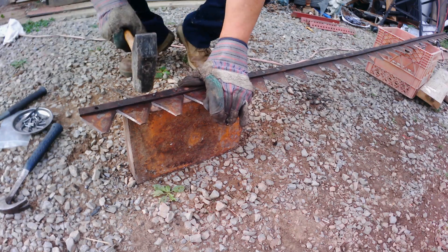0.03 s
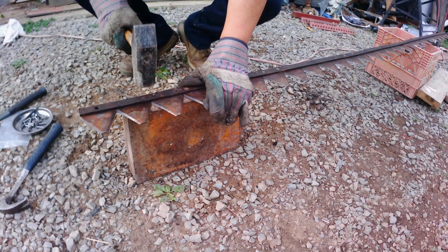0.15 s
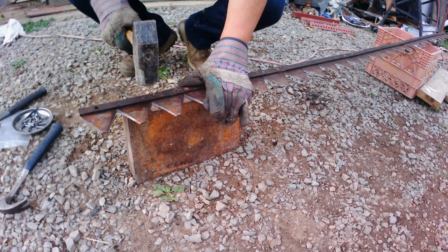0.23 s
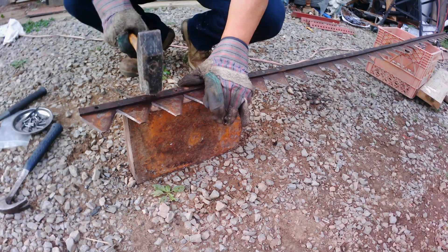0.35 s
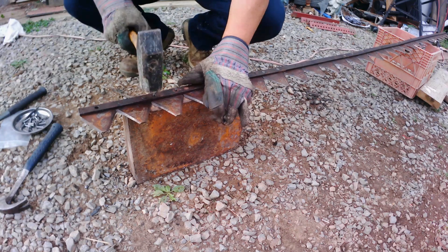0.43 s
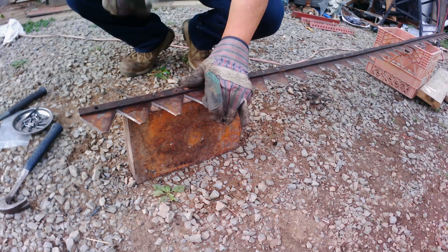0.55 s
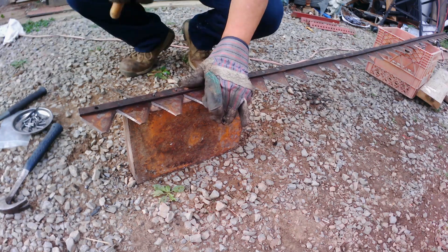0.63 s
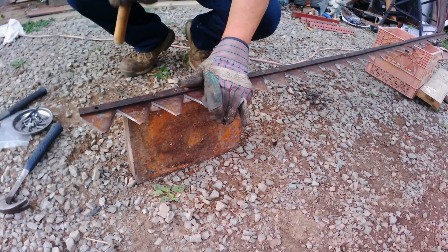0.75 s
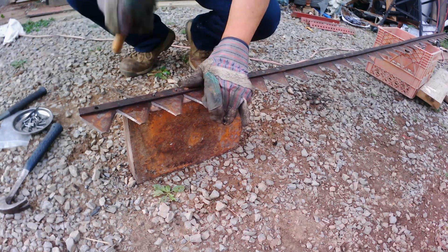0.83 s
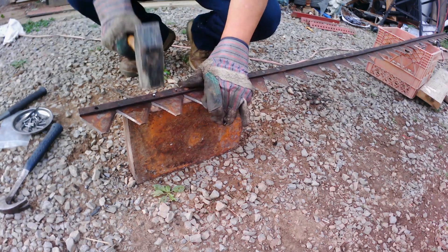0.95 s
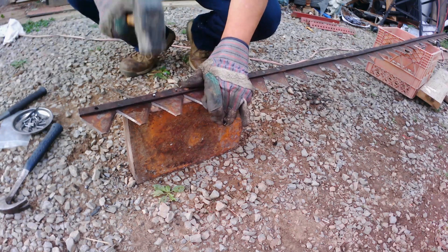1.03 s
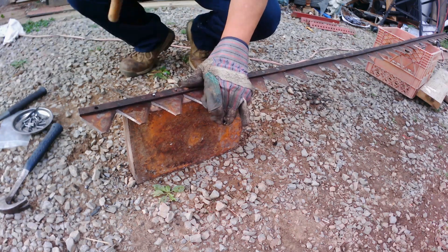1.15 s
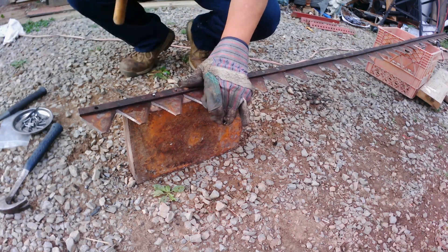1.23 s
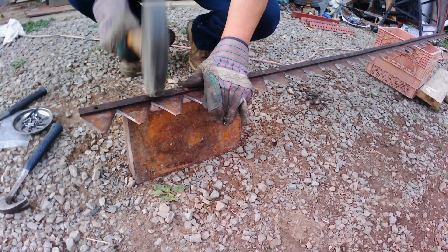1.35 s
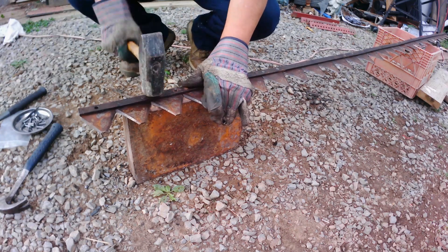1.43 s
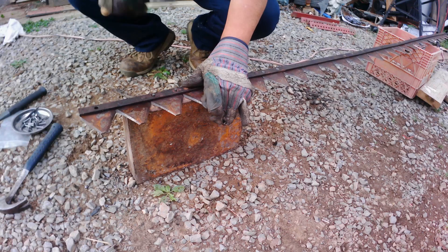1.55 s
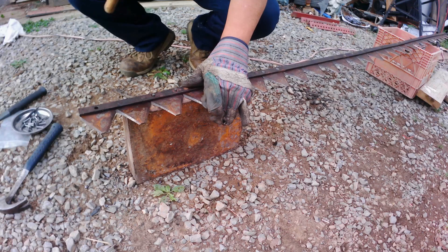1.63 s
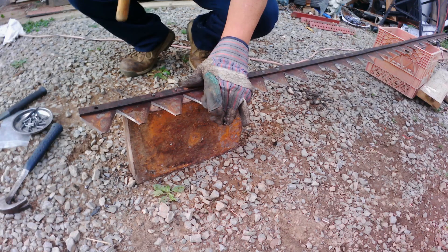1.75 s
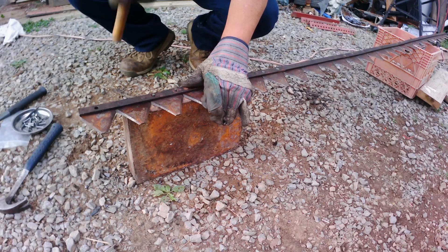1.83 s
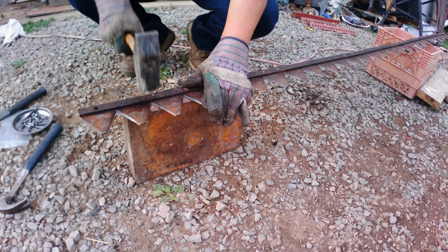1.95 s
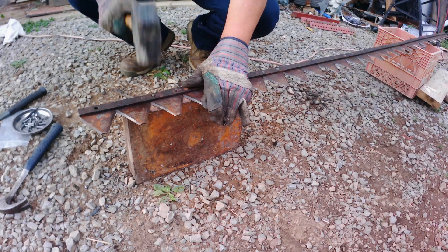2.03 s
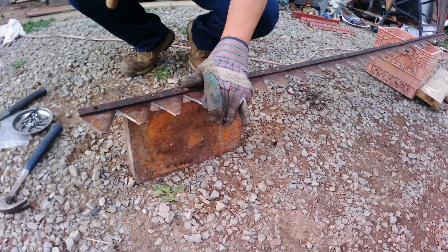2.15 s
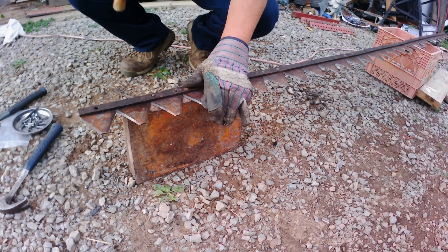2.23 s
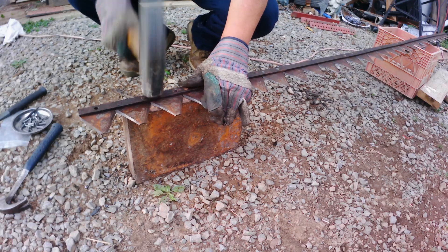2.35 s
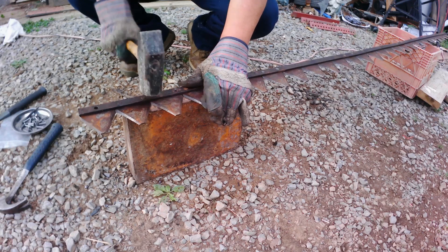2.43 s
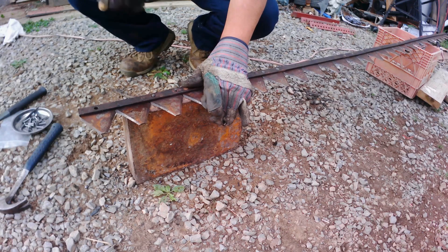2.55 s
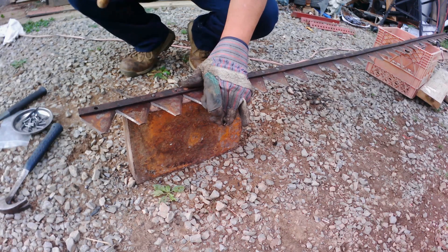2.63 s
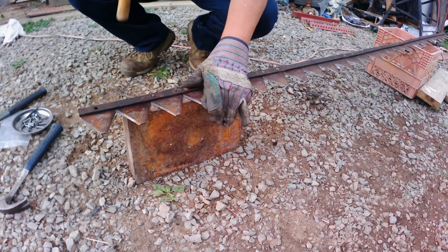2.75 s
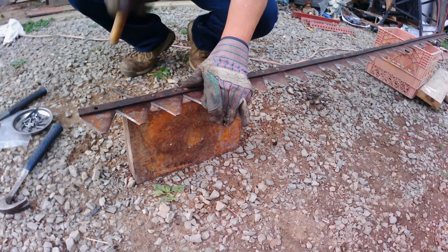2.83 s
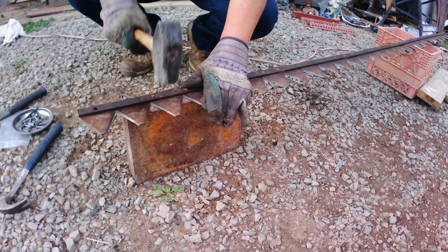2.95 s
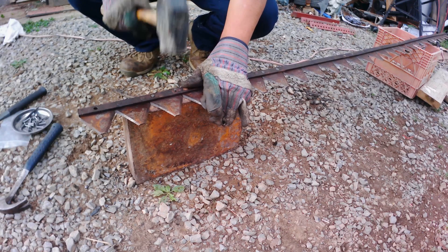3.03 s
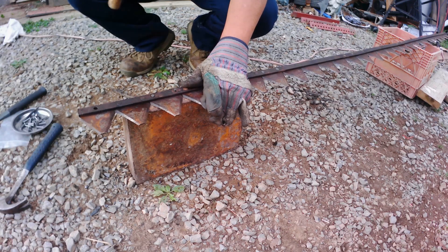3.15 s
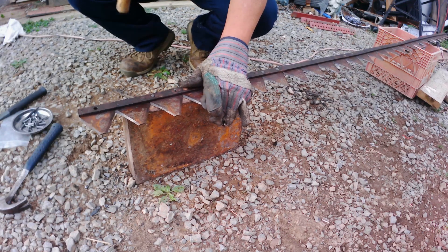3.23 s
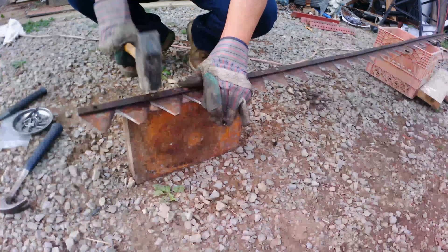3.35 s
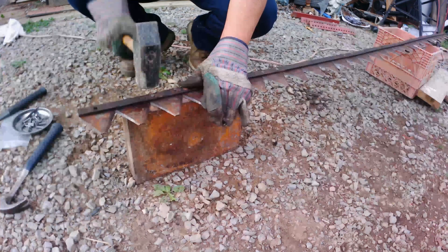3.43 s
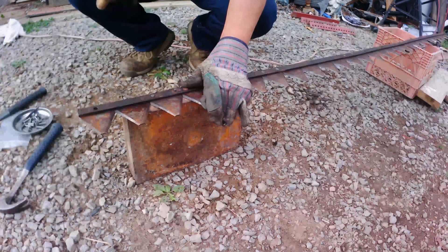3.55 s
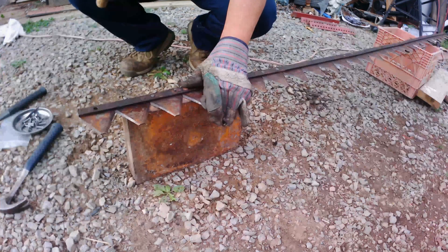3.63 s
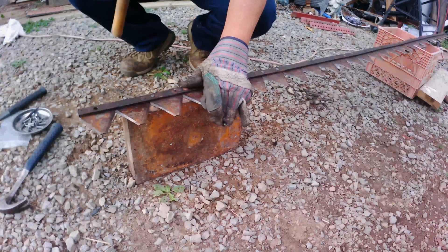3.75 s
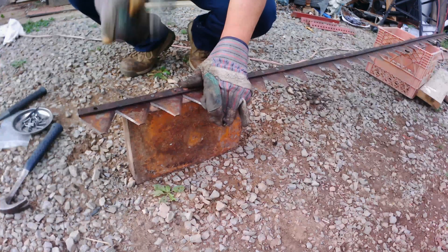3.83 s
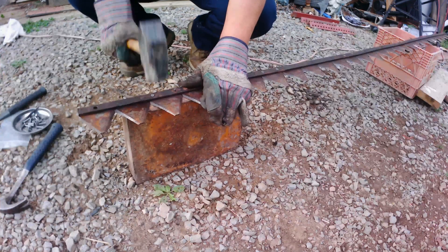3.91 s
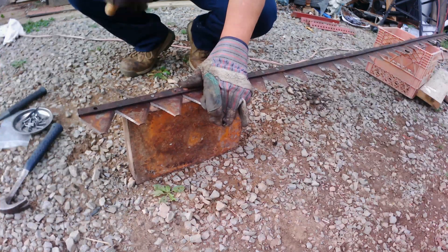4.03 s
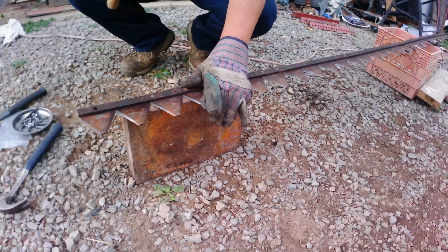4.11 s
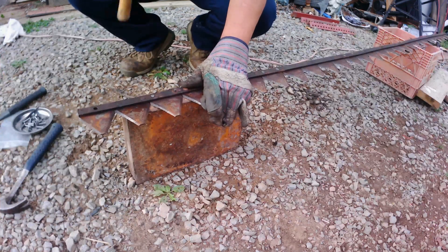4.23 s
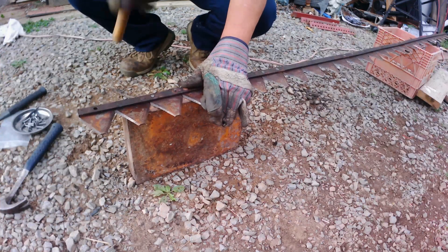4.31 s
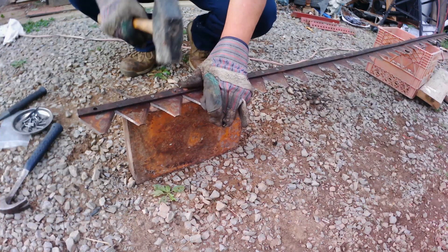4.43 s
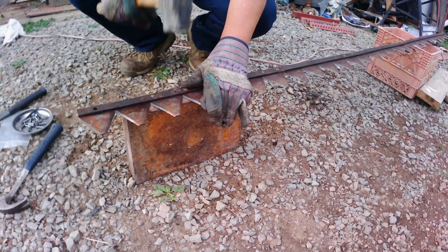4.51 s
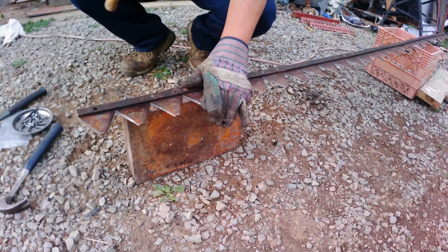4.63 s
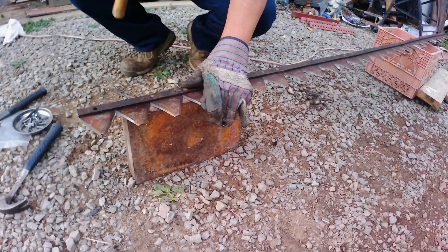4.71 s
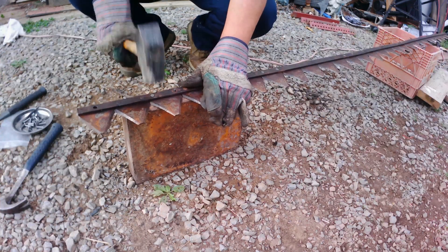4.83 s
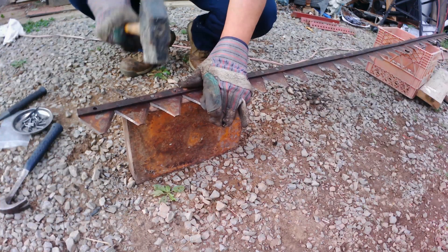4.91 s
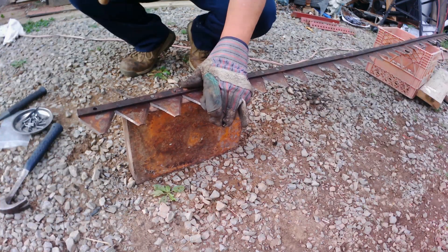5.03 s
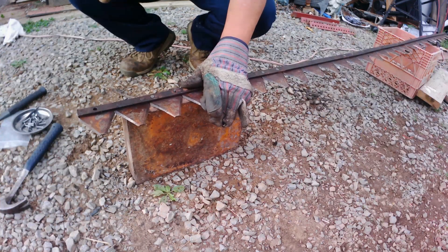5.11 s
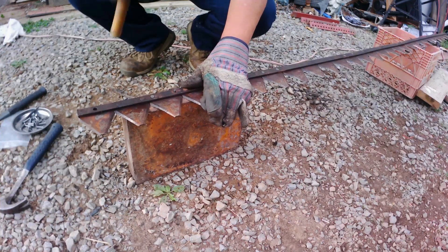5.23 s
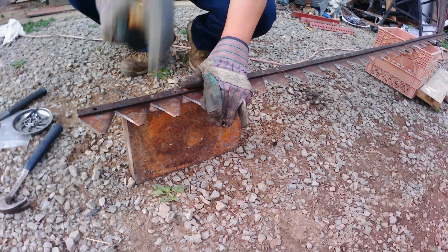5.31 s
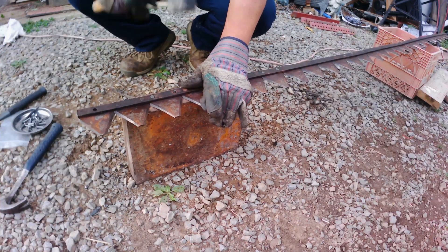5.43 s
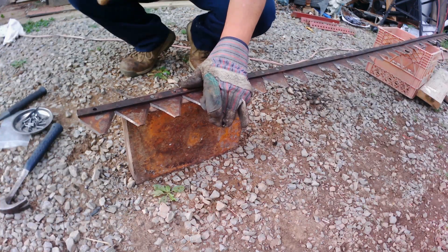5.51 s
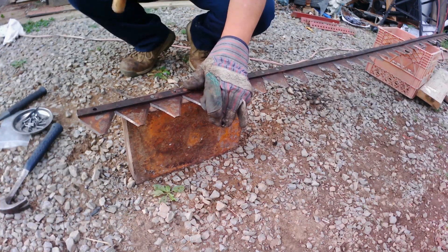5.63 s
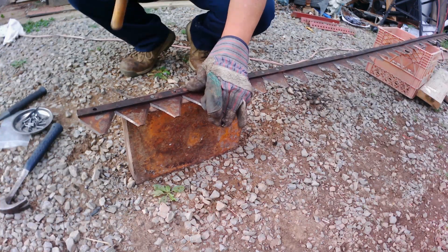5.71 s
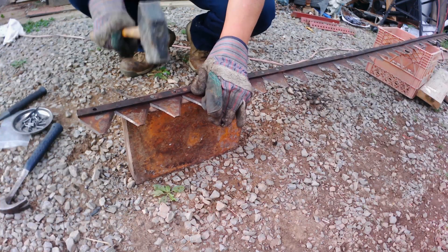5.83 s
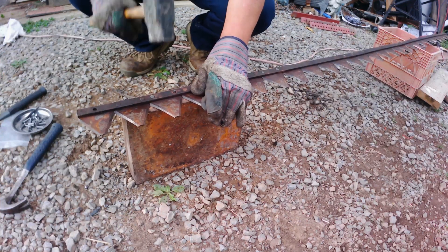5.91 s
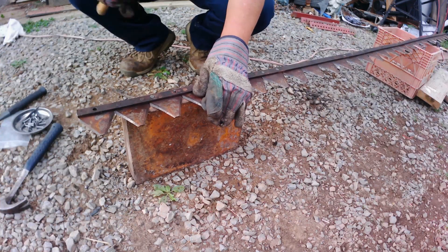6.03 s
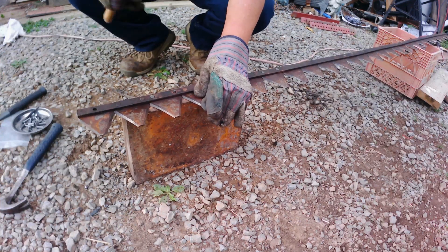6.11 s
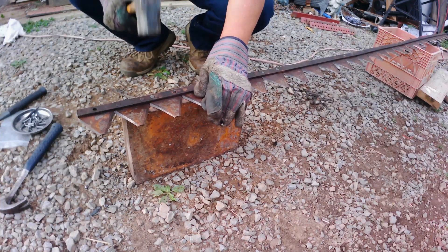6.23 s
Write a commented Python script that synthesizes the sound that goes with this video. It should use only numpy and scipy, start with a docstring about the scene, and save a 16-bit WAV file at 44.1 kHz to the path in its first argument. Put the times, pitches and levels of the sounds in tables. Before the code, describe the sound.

Close, evenly paced metallic hammer blows set a rivet outdoors, growing sharper, while a faraway machine holds a faint steady tone.

```python
"""An open yard, microphone close to a steel block on gravel: a heavy hammer sets a rivet in a cutter bar.
The soft rivet swallows the first of eleven blows; as it flattens, bar and block ring harder and brighter.
Each blow rattles blades and stones, thumps the ground, overloads the microphone and echoes faintly.
Soft scuffs on the gravel come first; in the distance a machine whines over the murmur of the air."""
import sys
import numpy as np
from scipy import signal
from scipy.fft import rfft, irfft
from scipy.io import wavfile

SR = 44100
rng = np.random.default_rng(int(sys.argv[2]) if len(sys.argv) > 2 else 0)


def wrap_up_sound(samples):
    """Save the sound to the file named by the first command line argument, as 16-bit audio."""
    columns = np.atleast_2d(samples).T
    # keep every value between -1 and 1, then stretch to whole-number steps
    tamed = np.clip(columns, -1, 1)
    steps = np.round(tamed * 32767).astype(np.int16)
    wavfile.write(sys.argv[1], SR, steps)


N = 276507
TIME = np.arange(N) / SR
AFTER = TIME[:SR * 3 // 4]  # time since a blow or scuff [s]

# outdoor background: (frequency [Hz], spectral level [dB])
AIR_SPECTRUM = [(20, -16), (60, -6), (160, 2), (300, -5), (550, -4.5), (800, -9), (1200, -5.5), (1600, -13),
                (2400, -20), (3400, -29), (7000, -32.5), (11000, -33), (12300, -36), (13200, -52)]
# the far machine's speed, heard as pitch: (time [s], pitch [Hz])
WHINE_PITCH = [(0, 628), (1.0, 633.7), (2.65, 631.5), (3.05, 638.4), (3.5, 633.9), (4.2, 632), (4.6, 638.5),
               (5.1, 637), (6.25, 636)]
# the whine fades away briefly: (time [s], depth [dB], half width [s])
WHINE_DIPS = [(0, -8, 0.26), (.68, -9, 0.073)]
# echo of the yard: (frequency [Hz], spectral level [dB])
ECHO_SPECTRUM = [(100, -13), (500, -9), (1500, 1), (2100, 0), (2260, 1.5), (2600, 1), (2900, -1.5),
                 (3300, -8), (4100, -3.5), (5000, -10.5), (5800, -11), (6600, -19), (7700, -14),
                 (9500, -42)]
# soft scuffs on the gravel: (time [s], level [dB], t60 [s])
SCUFFS = [(.013, -29.5, 0.057), (.06, -36, 0.39), (0.696, -30, 0.06), (0.709, -22.5, 0.044),
          (0.7316, -22.5, 0.023)]
# dull colour of a scuff: (frequency [Hz], spectral level [dB])
SCUFF_SPECTRUM = [(60, -44), (300, 7.5), (700, 1), (1200, 3), (1900, -15.5), (3000, -25), (8000, -54)]
# low thump and knock of each blow, including the steel's lowest modes:
# (frequency [Hz], level [dB], t60 [s], delay [s])
THUMP_MODES = [(157.7, 2.5, 0.068, 0.0051), (65.6, -29, 0.31, 0.01), (109.6, -30, 0.32, 0.0089),
               (189.3, -12, 0.083, 0.00637), (243, -7, 0.1, 0.00591), (314.8, -17.5, 0.15, 0.0046),
               (345.3, -10, 0.11, 0.00503), (380.3, -19, 0.16, 0.00506), (415, -10, 0.066, 0.00542),
               (733, -5, 0.061, 0.00218)]
# low boom that swells and beats after each blow: (frequency [Hz], level [dB], t60 [s])
BOOM_MODES = [(105.4, -18, 0.46), (117, -18, 0.51), (207, -32, 0.87)]
# dense rattle of loose blades and stones: (frequency [Hz], spectral level [dB])
RATTLE_SPECTRUM = [(25, -27), (90, -13), (200, -4), (400, -1.5), (600, 0.5), (750, -3), (1100, 3.5),
                   (1800, -0.5), (2700, -1.5), (3200, -11), (4100, -5.5), (6500, -18.5), (12000, -40),
                   (16000, -57)]
# how long that rattle lasts: (frequency [Hz], t60 [s])
RATTLE_DECAY = [(60, 0.25), (300, 0.1), (1000, 0.14), (2500, 0.13), (6000, 0.09), (14000, 0.16)]
# the bar lands and rebounds on the block: (time after contact [s], level [dB])
REBOUNDS = [(0, 6.5), (0.012, -28), (0.033, -17.5), (.044, -19)]
# modes of bar, block and hammer head: (frequency [Hz], level [dB], t60 [s])
STEEL_MODES = [(859, -4, .09), (1021, -1, .13), (1120, -4, .1), (1197, -4, .11), (1351, -3, .095),
               (1438, -5, .145), (1466, -6, .135), (1614, -8, .12), (1677, -3, .115), (1776, 4, .105),
               (1814, -3, .12), (1957, -8, .12), (2043, -6, .135), (2246, -1, .115), (2444, -4, .105),
               (2652, 2, .11), (2733, -3, .1), (2860, -5, .1), (3672, -9, .1), (3956, -7, .09),
               (4090, -8, .1), (4665, -13, .11), (5951, -14, .125), (7530, -17, .11), (7593, -18, .12),
               (7854, -19, .19), (12060, -25, .12), (2256, -37, .9), (2466, -46, 1), (2923, -47, 1.1)]
# each blow lands a little differently, and high modes feel it most: (frequency [Hz], level spread [dB])
AIM_SPREAD = [(900, 2), (4000, 2.6), (7500, 4.5)]
# hammer blows: (time [s], force [dB], high ping of the hammer head [dB])
BLOWS = [(0.8927, -8, -10), (1.3942, -3.5, -6), (1.8992, -4.5, 1.5), (2.3928, -0.5, -1),
         (2.8879, 0.5, -3.5), (3.3778, 1, -6), (3.8646, 3, -2.5), (4.3447, 1, -3), (4.8228, 2, -0.5),
         (5.308, 3, 1.5), (5.7875, 1.5, 0.5)]
# overall colour, with thinner deep bass and a step down above 12.5 kHz: (frequency [Hz], gain [dB])
OVERALL_COLOUR = [(20, -6), (45, -7), (65, -1), (12500, 1.5), (13100, -8), (16000, -6)]


def amp(db):
    """Decibels to gain."""
    return 10 ** (np.asarray(db) / 20)


def unit(x):
    """Scales to rms 1."""
    return x / np.sqrt(np.mean(x ** 2) + 1e-20)


def read(points, hz):
    """Reads a table on a log-frequency axis."""
    f, value = np.transpose(points)
    return np.interp(np.log(hz + 1), np.log(f), value)


def add(mix, start_s, sound):
    """Mixes a sound in at a time."""
    part = mix[max(round(start_s * SR), 0):][:len(sound)]
    part += sound[:len(part)]


def fade(t, t60):
    """Exponential decay, 60 dB down at t60."""
    return np.exp(-np.log(1000) * t / t60)


def colour(x, spectrum):
    """Filters by a spectrum."""
    hz = np.fft.rfftfreq(len(x), 1 / SR)
    return irfft(rfft(x) * amp(read(spectrum, hz)), len(x))


def noise(spectrum, size):
    """Coloured noise of rms 1."""
    return unit(colour(rng.standard_normal(size), spectrum))


def drift(rate_hz):
    """Slow random wander of rms 1."""
    hz = np.fft.rfftfreq(N, 1 / SR)
    return unit(irfft(rfft(rng.standard_normal(N)) / (1 + (hz / rate_hz) ** 4), N))


def air(db=-42, thin_db=-75, swell_db=.5):
    """All around: a steady murmur of outdoor air, with two very thin high tones."""
    swell = amp(swell_db * drift(4))
    thin_tones = sum(np.sin(2 * np.pi * hz * TIME) for hz in (7052, 10900))
    return amp(db) * swell * noise(AIR_SPECTRUM, N) + amp(thin_db) * thin_tones


def far_machine(db=-38, flutter_db=1.35, swell_db=0.4, octave_db=-22, early_boost_db=11, early_s=0.77):
    """Far off: a machine's whine wavers in the open air; its weak octave is clearest at first."""
    waver = 1 + .0022 * drift(10)
    pitch_hz = np.interp(TIME, *np.transpose(WHINE_PITCH)) * waver
    phase = 2 * np.pi * np.cumsum(pitch_hz) / SR
    octave = amp(octave_db + early_boost_db * np.exp(-(TIME / early_s) ** 2) + 2 * drift(2))
    dips_db = sum(depth_db * np.exp(-((TIME - s) / width) ** 2) for s, depth_db, width in WHINE_DIPS)
    level_db = db + dips_db + swell_db * drift(1.5) + flutter_db * drift(27)
    return np.sqrt(2) * amp(level_db) * (np.sin(phase) + octave * np.sin(2 * phase))


def yard_echo(ring_db, db=-37, t60=2, rise_s=.06, farthest_s=0.34, tail_t60=1.0):
    """Things around the yard scatter a blow back; the echoes thin out past the farthest."""
    tail = fade(np.maximum(AFTER - farthest_s, 0), tail_t60)
    envelope = np.minimum(AFTER / rise_s, 1) * fade(AFTER, t60) * tail
    return amp(db + ring_db) * envelope * noise(ECHO_SPECTRUM, len(AFTER))


def gravel_scuffs(rise_s=0.00067):
    """Small dull scrapes on the gravel before the first blow."""
    out = np.zeros(N)
    for start_s, db, t60 in SCUFFS:
        envelope = fade(AFTER, t60) * np.minimum(AFTER / rise_s, 1)
        add(out, start_s, amp(db) * noise(SCUFF_SPECTRUM, len(AFTER)) * envelope)
    return out


def thump(force_db, thump_db=1, boom_delay_s=.02, swell_s=.2):
    """Ground and the steel's lowest modes thump and knock just after contact; a low boom lingers."""
    out = np.zeros(len(AFTER))
    for hz, mode_db, t60, delay_s in THUMP_MODES:
        t = np.maximum(AFTER - delay_s, 0)
        out += amp(thump_db + mode_db) * np.sin(2 * np.pi * hz * t) * fade(t, t60)
    for hz, mode_db, t60 in BOOM_MODES:
        t = np.maximum(AFTER - boom_delay_s, 0)
        out += amp(mode_db) * np.sin(2 * np.pi * hz * t) * fade(t, t60) * np.minimum(t / swell_s, 1)
    return amp(force_db) * out


def rivet(blows_taken, half_set_blows=4.7, setting_blows=0.79):
    """The rivet flattens from soft to set, and passes on more of each blow with a brighter ring."""
    flatness = 1 / (1 + np.exp((half_set_blows - blows_taken) / setting_blows))
    passed_db = np.interp(flatness, [0, 1], [-9.5, -3])
    tilt = np.interp(flatness, [0, 1], [-0.2, 1.9])  # dB per octave
    return passed_db, tilt


def contact_db(hz, ring_db, tilt, knee_hz=1300, pivot_hz=2000):
    """A flatter rivet passes more to the upper modes; a harder, shorter contact favours the highest."""
    seating_db = ring_db * np.minimum(hz / knee_hz, 1)
    octaves = np.log2(np.maximum(hz, pivot_hz / 2) / pivot_hz)
    return seating_db + tilt * octaves


def rattle(force_db, ring_db, tilt, db=1.5, stones_hz=300, stones_share=0.76):
    """Blades and stones chatter at each uneven rebound: a dense ring whose bass follows the force."""
    hz, t, bands = signal.stft(noise(RATTLE_SPECTRUM, len(AFTER)), SR, nperseg=128)
    t60 = read(RATTLE_DECAY, hz)[:, None]
    power = 0
    for delay_s, hit_db in REBOUNDS:
        stretch, extra_db = rng.uniform([.88, -2], [1.12, 2])
        since_hit = t - delay_s * stretch
        envelope = amp(hit_db + extra_db) * fade(abs(since_hit), t60) * (since_hit >= 0)
        power = power + envelope ** 2
    stones_db = stones_share * force_db * np.exp(-hz / stones_hz)
    gain = amp(db + stones_db + contact_db(hz, ring_db, tilt))
    _, chatter = signal.istft(bands * gain[:, None] * np.sqrt(power), SR, nperseg=128)
    return chatter[:len(AFTER)]


def steel_ring(ring_db, tilt, ping_db, ping_above_hz=5500):
    """Each blow shares its energy anew among the steel's modes, and the loosely held bar sings on."""
    hz, mode_db, t60 = np.transpose(STEEL_MODES)
    aim, detune, start_turns = rng.standard_normal((len(hz), 3)).T
    is_ping = hz > ping_above_hz
    struck_hz = hz * (1 + detune * np.where(is_ping, .004, .0018))
    aim_db = aim * read(AIM_SPREAD, hz)
    gain = amp(mode_db + contact_db(hz, ring_db, tilt) + ping_db * is_ping + aim_db)
    turns = np.outer(struck_hz, AFTER) + start_turns[:, None]
    return gain @ (np.sin(2 * np.pi * turns) * fade(AFTER, t60[:, None]))


def smack(force_db, swing_hz=1050, swing_db=19, crack_db=8, crack_rise_s=0.00089):
    """First contact: a strong, quickly damped pressure swing, then a crack as the rivet gives."""
    swing = -amp(swing_db) * np.sin(2 * np.pi * swing_hz * AFTER) * fade(AFTER, t60=0.013)
    crack = noise([(200, 5), (1100, 2.0), (3500, 12.5), (8000, -2.5), (15000, -6.5)], len(AFTER))
    crack_envelope = fade(AFTER, t60=0.024) * np.minimum(AFTER / crack_rise_s, 1)
    return amp(force_db) * (swing + amp(crack_db) * crack * crack_envelope)


def hammer(spread_s=0.0022):
    """Close by: each blow flattens the rivet further; the ring takes a moment to spread along the bar."""
    out = np.zeros(N)
    onset = np.minimum(AFTER / spread_s, 1)
    for blows_taken, (start_s, force_db, ping_db) in enumerate(BLOWS):
        passed_db, tilt = rivet(blows_taken)
        ring_db = force_db + passed_db
        steel = onset * (steel_ring(ring_db, tilt, ping_db) + rattle(force_db, ring_db, tilt))
        add(out, start_s, smack(force_db) + steel + thump(force_db) + yard_echo(ring_db))
    return out


def scene():
    """Close hammering over the quiet yard, as it reaches one microphone."""
    return (hammer() + gravel_scuffs() + far_machine() + air())[None]


def record(dry, ceiling=0.87, hardness=5, cutoff_hz=15900):
    """The overloaded input flattens each blow. Deep bass is thinned; the top treble steps down and ends."""
    clipped = dry[0] / (1 + abs(dry[0] / ceiling) ** hardness) ** (1 / hardness)
    low_pass = signal.firwin(255, cutoff_hz, window=("kaiser", 8), fs=SR)
    return signal.oaconvolve(colour(clipped, OVERALL_COLOUR), low_pass, "same")[None]


dry = scene()
out = record(dry)
wrap_up_sound(out)
```